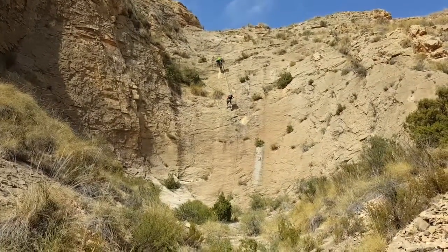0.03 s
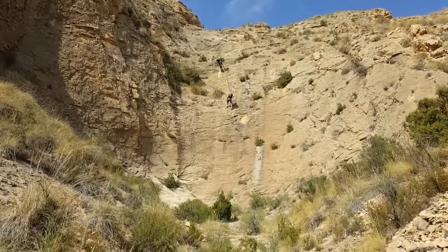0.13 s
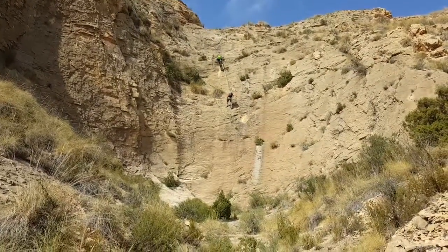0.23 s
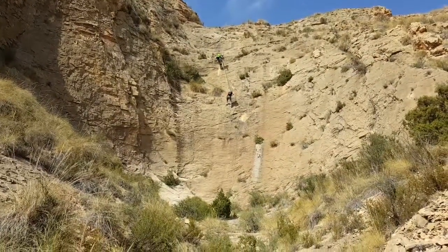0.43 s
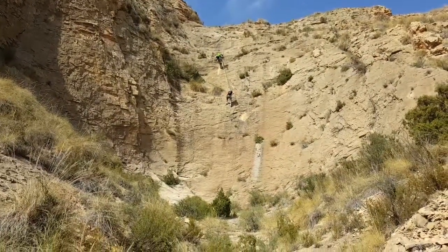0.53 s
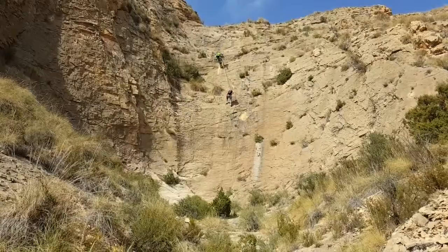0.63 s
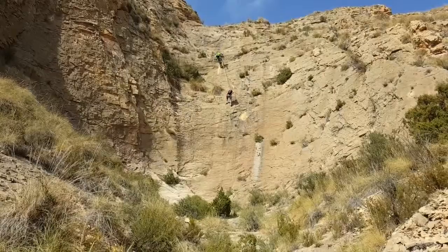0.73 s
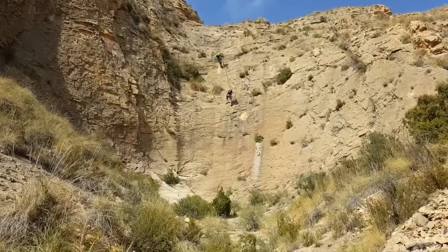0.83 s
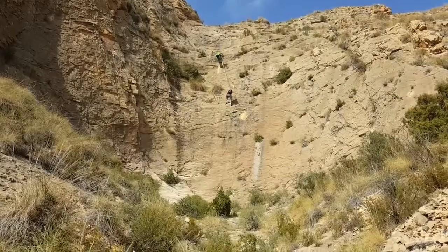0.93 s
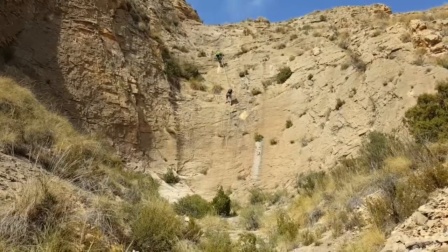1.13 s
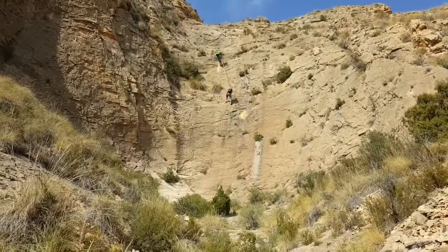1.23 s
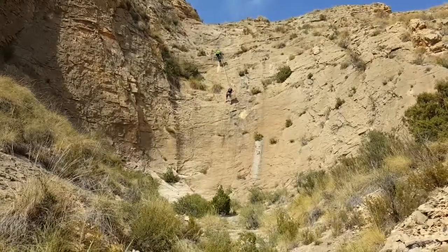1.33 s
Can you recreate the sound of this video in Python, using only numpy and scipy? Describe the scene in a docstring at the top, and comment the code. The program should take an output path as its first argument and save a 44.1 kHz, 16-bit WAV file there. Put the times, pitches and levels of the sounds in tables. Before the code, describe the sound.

Small metal gear clinks faintly close by, with low wind gusts buffeting the microphone.

```python
"""Clinking gear below a cliff

Outdoors at the foot of a rock cliff, two small pieces of metal gear swing close to the left microphone.
They clink and ring thinly when they strike, and tick and rub as their surfaces stick and slip.
Gusts buffet the same port with a low rumble, over a faint hiss of open air on both sides."""
import sys
import numpy as np
from scipy import signal
from scipy.fft import rfft, irfft, next_fast_len
from scipy.io import wavfile
from scipy.ndimage import uniform_filter1d

SR = 44100
rng = np.random.default_rng(int(sys.argv[2]) if len(sys.argv) > 2 else 0)


def int16_out(signal):
    """Quantize to a 16-bit WAV file."""
    q = np.round(np.clip(np.atleast_2d(signal).T, -1, 1) * 32767)
    wavfile.write(sys.argv[1], SR, q.astype(np.int16))


N = 61739
T = np.arange(N) / SR
FFT_SIZE = 2 * next_fast_len(N // 2 + 1)
HZ = np.maximum(np.arange(FFT_SIZE // 2 + 1) * SR / FFT_SIZE, 1)


# The modes of the long-ringing and the short-ringing piece.
# Each row: frequency in Hz, relative level in dB, seconds to fall 60 dB.
LONG_PIECE_MODES = [(2259, 0, .65), (3190, -11, .25), (3811, -8, .3), (5720, -10, .19), (7590, -15, .25),
                    (8288, -9, .19), (9393, -14, .7), (11200, -9, .09), (14606, -16, .28),
                    (14614, -19, .28), (15368, -13, .26)]
SHORT_PIECE_MODES = [(3013, 0, .135), (3730, -18, .08), (4758, -11, .095), (6870, -18, .06),
                     (7150, -19, .07), (11300, -27, .05)]
# Their strikes, close on the left. Each row: start in seconds, level in dB, favoured frequency in Hz,
# reach around it in octaves, seconds of free ringing.
LONG_PIECE_HITS = [(0.3154, -51.5, 2170, 0.59, 0.28), (0.333, -51.5, 11300, 1.0, 0.13),
                   (.346, -59, 3900, 0.66, 0.17), (.4121, -64.5, 9800, 0.46, .07),
                   (.597, -59, 9500, 0.08, .025), (0.687, -43.5, 5740, 0.12, 0.058),
                   (1.303, -61, 9500, .12, .12), (1.314, -54, 2230, 0.17, 0.042),
                   (1.314, -58.5, 3850, .08, .1), (1.321, -55, 7500, 0.041, 0.017)]
SHORT_PIECE_HITS = [(0.211, -55, 3000, 0.45, 0.0026), (.222, -63, 3800, .9, .08),
                    (0.335, -52.5, 3040, .8, 0.17), (.272, -54, 4830, .25, 0.071),
                    (0.376, -55.5, 3000, .5, .13), (0.461, -65, 3000, .5, 0.048),
                    (.688, -80, 3540, 0.23, 0.0044), (1.2215, -37, 3200, 3.5, 0.013),
                    (1.231, -41, 4300, 1.2, 0.03), (1.286, -58.5, 3000, .5, 0.0073),
                    (1.303, -44, 4760, 0.11, 0.018)]

def clinks(modes, hits, rise_s=.001, damped_t60_s=.065):
    """Each hit sets the modes ringing until the piece comes to rest against something and is damped."""
    out = np.zeros(N)
    for start, db, favoured_hz, reach, free_s in hits:
        age = T[T >= start] - start
        damping_db = 60 * np.maximum(age - free_s, 0) / damped_t60_s
        envelope = (1 - np.exp(-age / rise_s)) * from_db(db - damping_db)
        for hz, mode_db, t60 in modes:
            ring = from_db(mode_db - 60 * age / t60) * np.sin(2 * np.pi * hz * age)
            out[N - len(age):] += excitation(hz, favoured_hz, reach) * envelope * ring
    return out


def excitation(hz, favoured_hz, reach_octaves):
    """The point of contact excites the frequencies around one pitch most strongly."""
    return (1 + (np.log2(hz / favoured_hz) / reach_octaves) ** 4) ** -.5


# The colour of dry metal contact. Each row: frequency in Hz, relative level in dB.
CONTACT_SPECTRUM = [(300, 8), (700, 1.5), (1400, 0.5), (2500, -2.5), (3900, -4), (5500, -10), (7500, -11),
                    (9500, -16.5), (11300, -11), (16000, -20.5)]

def stick_slip(per_s, spread_db, emphasis=1):
    """Surfaces catch and let go in dense, tiny clicks of uneven size."""
    sizes = from_db(spread_db * np.minimum(rng.exponential(1, N), 4)) * rng.choice([-1, 1], N)
    clicks = sizes * (rng.random(N) < per_s / SR)
    return unit_rms(coloured(clicks, gain_at(CONTACT_SPECTRUM, HZ) * emphasis))


# Dry touches beside the microphone. Each row: start in seconds, level in dB, seconds to fall 60 dB,
# favoured frequency in Hz, reach around it in octaves.
DRY_CONTACTS = [(0.091, -56, 0.016, 1800, 2), (0.213, -63, 0.052, 3000, 0.78), (.272, -66, 0.12, 4350, .8),
                (0.3006, -57, 0.11, 3600, 1.4), (0.3142, -53, 0.14, 3120, 0.97),
                (0.3325, -53.5, 0.24, 8500, 1.36), (0.333, -57, 0.052, 10800, 0.054),
                (0.411, -54.5, 0.028, 3940, 0.086), (0.5416, -55.5, 0.045, 2040, 0.31),
                (0.5732, -57, 0.06, 3000, 3.6), (0.6261, -50.5, 0.055, 1100, 1.3),
                (0.6608, -42, .025, 2240, 2), (0.6868, -48.5, 0.026, 1500, 3),
                (0.687, -48.5, 0.088, 3370, 0.43), (.797, -78, 0.036, 1500, 2),
                (0.903, -58, 0.03, 1200, 6.6), (0.916, -52, 0.036, 1160, 1.2),
                (1.2198, -55, 0.09, 4830, 1.3), (1.232, -58.5, 0.11, 4000, 0.5),
                (1.271, -62, 0.12, 4070, 0.66), (1.3012, -55, 0.14, 4300, 0.93)]

def ticks(rise_s=.0004):
    """A dry contact is a sharp burst of chatter that dies quickly."""
    out = np.zeros(N)
    for start, db, t60, favoured_hz, reach in DRY_CONTACTS:
        age = np.maximum(T - start, 0)
        chatter = stick_slip(per_s=4200, spread_db=2.5, emphasis=excitation(HZ, favoured_hz, reach))
        out += chatter * (1 - np.exp(-age / rise_s)) * from_db(db - 60 * age / t60)
    return out


# The rise and fall of the scraping. Each row: time in seconds, level in dB.
RUB_LEVELS = [(0, -76), (.19, -75), (.29, -66), (.35, -62), (.43, -65), (.5, -66.5), (.58, -62),
              (.65, -60.5), (.72, -60.5), (.78, -70.5), (.9, -73), (1.05, -84), (1.21, -97), (1.25, -80),
              (1.4, -66.5)]

def rubbing():
    """The pieces slide over each other as they swing, with a faint, grainy scrape."""
    return from_db(in_time(RUB_LEVELS)) * stick_slip(per_s=6000, spread_db=2)


def through_metal(contact, ring_db=4.5, half_width_hz=9.4):
    """Contact noise is heard directly and through the modes, which are broader while the pieces touch."""
    modes = LONG_PIECE_MODES + SHORT_PIECE_MODES
    resonances = sum(1 / (1 + 1j * (HZ - hz) / half_width_hz) for hz, _, _ in modes)
    return coloured(contact, 1 + from_db(ring_db) * resonances)


# The colour of wind on a microphone port. Each row: frequency in Hz, relative level in dB.
WIND_SPECTRUM = [(20, -39), (45, -8.5), (88, -0.5), (165, -2.5), (250, -10), (350, -23.5), (500, -34),
                 (750, -50.5), (1200, -80), (2000, -105)]

def rumble(pitch=1, eddy_s=.027, evenness=.88):
    """Turbulent noise of nearly even strength; faster eddies shift its colour upward."""
    noise = unit_rms(coloured(rng.standard_normal(N), gain_at(WIND_SPECTRUM, HZ / pitch)))
    power = abs(signal.hilbert(noise)) ** 2 / 2
    window = int(eddy_s * SR)
    local_power = uniform_filter1d(uniform_filter1d(power, window), window)
    return noise / local_power ** (evenness / 2)


# Wind across the left port. Each row: time in seconds, level of the low rumble in dB.
GUST_LEVELS = [(0, -40.5), (.025, -34), (.075, -31), (.097, -43.5), (.135, -41), (.166, -43.5), (.2, -57.5),
               (.235, -27), (.315, -34.5), (.37, -34), (.41, -24), (.44, -35.5), (.505, -36.5), (.55, -36),
               (.575, -31), (.68, -37), (.74, -36), (.795, -58.5), (.84, -45.5), (.89, -43.5), (.925, -59),
               (1.04, -69), (1.1, -50.5), (1.23, -49), (1.275, -55), (1.355, -83), (1.4, -32.5)]

def gusts(pivot_hz=119, reference_db=-25, brightening=.42):
    """Airflow rumbles on the port; stronger flow is also brighter in the octaves above the pivot."""
    flow_db = in_time(GUST_LEVELS)
    tilt_db_per_octave = brightening * (flow_db - reference_db)
    noise, out = rumble(), np.zeros(N)
    for octave in range(-4, 5):
        band_gain = np.maximum(1 - abs(np.log2(HZ / pivot_hz) - octave), 0)
        out += coloured(noise, band_gain) * from_db(flow_db + tilt_db_per_octave * max(octave, 0))
    return out


# Single eddies, hard on the left port and a few faint ones on the right.
# Each row: centre in seconds, level in dB, half length in seconds, pitch of the rumble as a ratio.
LEFT_EDDIES = [(.065, -30, 0.0081, 0.89), (.119, -30.5, 0.0071, 0.79), (.248, -18.5, 0.0022, 0.76),
               (.268, -13, 0.0039, 1.42), (.281, -14, 0.0056, 0.68), (.341, -24.5, 0.0044, 0.98),
               (.453, -22, 0.0071, 1.15), (.471, -19.5, 0.0054, 1.025), (.59, -31.5, 0.016, 0.95),
               (.71, -29.5, 0.0049, 1.25), (.828, -31.5, 0.0036, 0.28), (.86, -39, 0.0023, 1.1),
               (1.07, -37, 0.0058, 0.6), (1.17, -43.5, 0.01, 0.38), (1.31, -37.5, 0.0064, 0.51),
               (1.38, -41.5, 0.013, 0.71)]
RIGHT_EDDIES = [(.6, -51, .014, .8), (.948, -42, .008, .8), (1.25, -48, .01, .7), (1.375, -53, .004, 1.7)]

def buffets(eddies):
    """Each eddy hits the port as a short, bell-shaped swell of rumble."""
    out = np.zeros(N)
    for centre, db, half_s, pitch in eddies:
        swell = np.exp(-((T - centre) / (2 * half_s)) ** 2)
        out += from_db(db) * swell * rumble(pitch)
    return out


# The hardest eddies on the left port. Each row: centre in seconds, peak level in dB, pitch as a ratio.
PRESSURE_SLAPS = [(.263, -4, 1.26), (0.448, -15.5, 1.3)]

def slaps():
    """A hard eddy slaps the port: pressure swings one way and back, with the colour of the wind."""
    out = np.zeros(N)
    for centre, db, pitch in PRESSURE_SLAPS:
        phase = 1j * np.exp(-2j * np.pi * HZ * centre)  # the quarter turn makes two opposite lobes
        swing = irfft(gain_at(WIND_SPECTRUM, HZ / pitch) * phase, FFT_SIZE)[:N]
        out -= from_db(db) * swing / abs(swing).max()
    return out


# Open air all around. Each row: frequency in Hz, level in dB per Hz before each side's trim.
AIR_SPECTRUM = [(20, -77.5), (50, -72.5), (100, -83), (180, -93), (400, -99), (1000, -103), (2500, -107),
                (5000, -114), (9000, -119), (13000, -116), (16000, -117)]

def open_air(trims_db=(-.5, -1)):
    """Faint, steady rumble and hiss, unrelated on the two sides."""
    gain = gain_at(AIR_SPECTRUM, HZ) * np.sqrt(SR / 2)
    return np.array([from_db(db) * coloured(rng.standard_normal(N), gain) for db in trims_db])


def from_db(db):
    """Decibels to gain."""
    return 10 ** (np.asarray(db) / 20)


def unit_rms(x):
    """Scale to unit power."""
    return x / np.sqrt(np.mean(x ** 2) + 1e-20)


def in_time(rows):
    """Join timed points into a curve with a value at every sample."""
    return np.interp(T, *np.transpose(rows))


def gain_at(spectrum, hz):
    """Read a dB spectrum as gain, on a log-frequency axis."""
    points_hz, db = np.transpose(spectrum)
    return from_db(np.interp(np.log(hz), np.log(points_hz), db))


def coloured(x, gain):
    """Filter by one gain per frequency."""
    return irfft(rfft(x, FFT_SIZE) * gain, FFT_SIZE)[:N]


def scene(gear_right_db=-52):
    """The gear hangs hard left, by the port that takes the gusts; open air lies on both sides."""
    gear = clinks(LONG_PIECE_MODES, LONG_PIECE_HITS) + clinks(SHORT_PIECE_MODES, SHORT_PIECE_HITS)
    gear += through_metal(ticks() + rubbing())
    left = gear + gusts() + buffets(LEFT_EDDIES) + slaps()
    right = from_db(gear_right_db) * gear + buffets(RIGHT_EDDIES)
    return np.array([left, right]) + open_air()


def record(dry):
    """A steep low-pass cuts the highest treble."""
    cutoff_hz = 15850
    return signal.sosfilt(signal.ellip(12, .1, 80, cutoff_hz, fs=SR, output="sos"), dry)


dry = scene()
out = record(dry)
int16_out(out)
```